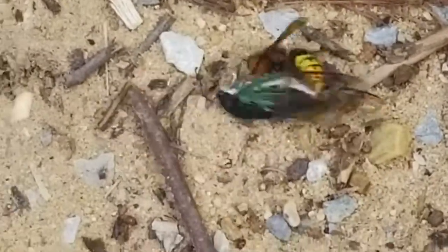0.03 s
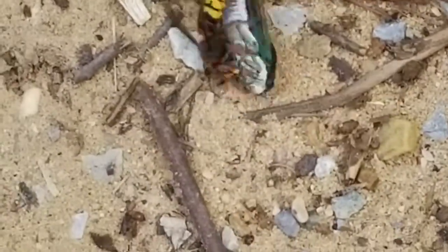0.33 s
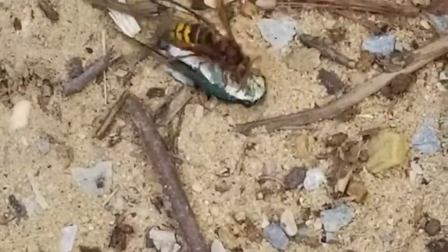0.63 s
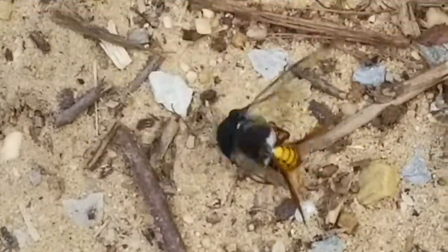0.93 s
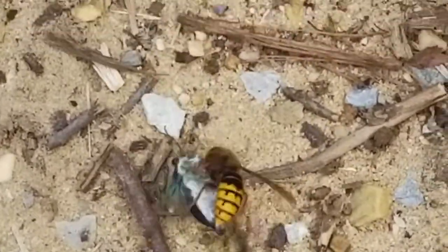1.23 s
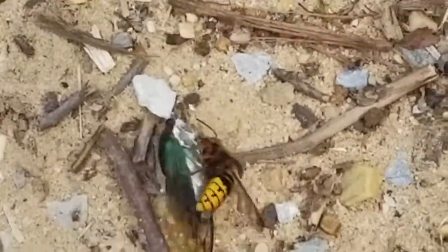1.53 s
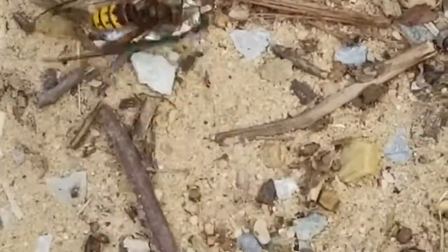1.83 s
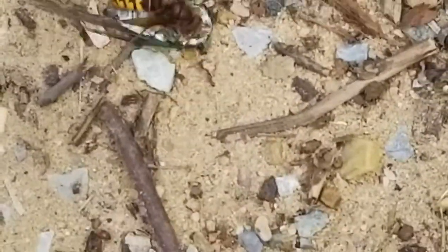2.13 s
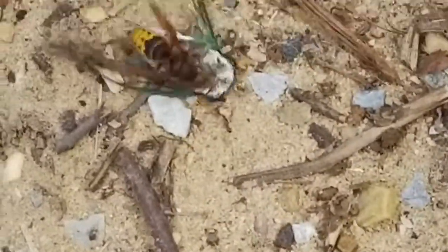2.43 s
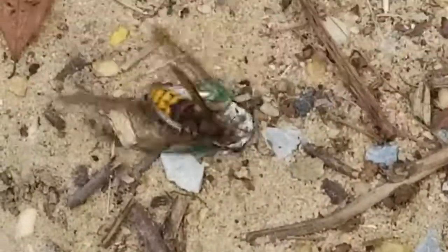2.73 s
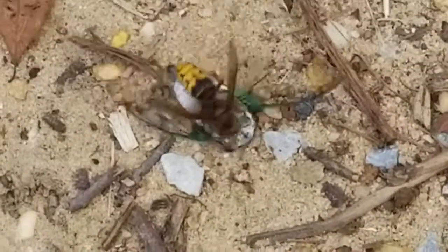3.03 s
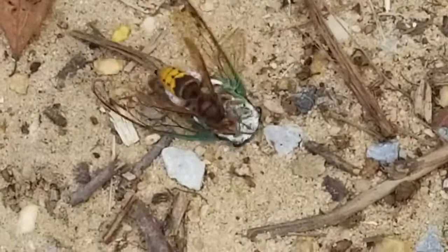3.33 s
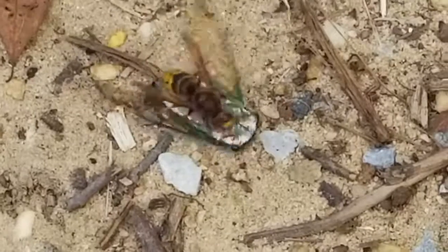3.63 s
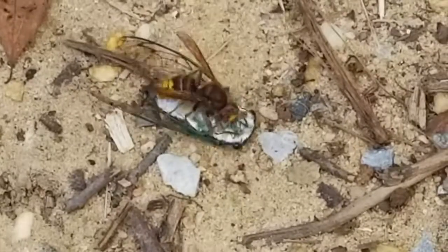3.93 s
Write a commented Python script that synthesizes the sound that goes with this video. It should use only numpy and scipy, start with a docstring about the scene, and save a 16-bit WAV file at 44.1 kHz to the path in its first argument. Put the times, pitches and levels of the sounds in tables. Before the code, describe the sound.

Insect wings flutter and scrape on sand as a wasp wrestles a cicada.

```python
"""Wasp and cicada on sand

Close to the microphone, a wasp wrestles a cicada on sandy ground. Stiff wings slap and scrape the grit,
legs and bodies rustle through it amid sharp ticks, and the wings whirr in short bouts over a low drone.
Farther off, insects buzz and chirp in the trees, with a few faint whistles and a distant rumble."""
import sys
import numpy as np
from scipy import signal
from scipy.fft import rfft, irfft
from scipy.io import wavfile
from scipy.ndimage import uniform_filter1d

SR = 44100
rng = np.random.default_rng(int(sys.argv[2]) if len(sys.argv) > 2 else 0)


def to_wav(sig):
    """Store sig (one row per channel, or 1-D mono) as 16-bit WAV at the path in sys.argv[1].

    Samples outside -1..1 are clipped; the rate is SR.
    """
    pcm = np.clip(np.atleast_2d(sig), -1, 1) * 32767
    pcm = np.round(pcm).astype(np.int16)
    wavfile.write(sys.argv[1], SR, pcm.T)  # frames by channels


N = 176400

# wings hitting the ground, close up (time [s], contact [s], grit [dB], wing ring [dB], crunch [dB])
WING_STRIKES = [(0.213, 0.0036, -48.5, -47, -53.5), (0.523, 0.015, -45, -59, -65),
                (0.753, 0.0037, -44.5, -43.5, -80), (0.887, 0.0045, -52, -52, -53),
                (1.223, 0.0028, -36.5, -36.5, -58), (1.263, 0.013, -42.5, -42, -49.5),
                (1.317, 0.0054, -41.5, -40, -47), (1.371, 0.011, -32.5, -33.5, -76),
                (1.435, 0.0075, -41, -44.5, -54.5), (1.659, 0.0032, -32.5, -28.5, -70),
                (1.689, 0.0069, -51, -46.5, -52), (1.884, 0.0052, -44.5, -40, -55),
                (1.907, 0.0028, -58, -41, -49), (1.929, 0.0024, -37, -31, -48),
                (1.976, 0.0039, -45, -44, -64), (2.126, 0.0044, -41.5, -38.5, -67),
                (2.321, 0.0056, -41, -41, -67), (2.346, 0.002, -42, -40, -52),
                (2.366, 0.006, -39, -48, -55), (2.389, 0.0087, -38.5, -41.5, -70),
                (2.419, 0.0092, -36.5, -42.5, -68), (2.437, 0.0046, -40, -42, -61),
                (2.463, 0.0074, -36.5, -40.5, -71), (2.513, 0.007, -39, -44, -69),
                (2.533, 0.002, -48, -36, -63), (2.539, 0.0033, -36.5, -37, -70),
                (2.575, 0.0038, -33, -38, -50), (2.631, 0.0075, -40.5, -45, -55),
                (2.748, 0.006, -46, -40.5, -75), (2.777, 0.006, -44, -37, -74),
                (2.8, 0.0044, -39, -43, -53.5), (2.822, 0.01, -46, -42, -74),
                (2.985, 0.0037, -43.5, -38, -77), (3.013, 0.0022, -37.5, -41, -65),
                (3.032, 0.0093, -45, -58, -52), (3.164, 0.005, -46, -55, -67),
                (3.181, 0.011, -41, -50, -72), (3.21, 0.0018, -37, -31.5, -44.5),
                (3.231, 0.0017, -37, -42, -53), (3.362, 0.0057, -38, -38.5, -57),
                (3.39, 0.003, -43, -45, -44), (3.409, 0.0076, -46, -54, -50),
                (3.428, 0.0056, -44, -41, -55), (3.57, 0.0046, -40.5, -43, -69),
                (3.597, 0.0018, -39, -44, -44), (3.614, 0.002, -45, -38.5, -56),
                (3.756, 0.0035, -39.5, -35.5, -75), (3.786, 0.0014, -41, -42, -54),
                (3.805, 0.004, -45, -52, -52.5)]
# bodies and legs dragged through the sand (start [s], end [s], level [dB])
BODY_DRAGS = [(0.083, 0.102, -59.5), (0.186, 0.23, -59), (0.25, 0.272, -59), (0.382, 0.416, -64.5),
              (0.49, 0.562, -59), (0.663, 0.705, -66.5), (0.756, 0.812, -55), (0.852, 0.912, -56.5),
              (1.02, 1.148, -70.5), (1.198, 1.311, -55.5), (1.326, 1.42, -52.5), (1.464, 1.491, -48.5),
              (1.497, 1.555, -64.5), (1.604, 1.67, -63.5), (1.654, 1.7, -47.5), (1.716, 1.792, -63.5),
              (1.888, 1.966, -48), (1.98, 2.022, -43.5), (2.104, 2.17, -53), (2.176, 2.234, -67),
              (2.317, 2.405, -49.5), (2.408, 2.565, -47.5), (2.568, 2.694, -53), (2.752, 2.788, -43),
              (2.808, 2.892, -47), (2.892, 2.949, -56.5), (2.982, 3.086, -47.5), (3.098, 3.23, -58.5),
              (3.222, 3.271, -42), (3.265, 3.295, -51), (3.36, 3.45, -49), (3.45, 3.51, -60),
              (3.572, 3.62, -51.5), (3.618, 3.652, -44.5), (3.65, 3.725, -54.5), (3.761, 3.857, -46),
              (3.837, 3.894, -52)]
# spectra of scattered grit, crunched soil and rustling sand (frequency [Hz], relative level [dB])
GRIT_SPECTRUM = [(600, -17), (1500, -12.5), (3100, -11), (4000, -5.5), (4800, -1), (5600, -17), (6800, 0),
                 (8100, -1.5), (9100, -0.5), (9800, 1), (11000, 6), (11450, -6.5), (12800, 0.5),
                 (15800, -5)]
CRUNCH_SPECTRUM = [(200, -12), (600, 1.5), (1050, 1.5), (1300, 1), (1750, 5), (3000, -6), (5000, 3.5),
                   (10000, -40)]
SAND_SPECTRUM = [(600, -19.5), (1500, -8), (3100, -10.5), (4000, -4.5), (4800, -3), (5600, -9), (6800, 1.5),
                 (8100, -0.5), (9100, -11), (9800, 3.5), (11000, 3), (11450, -3), (12800, -1),
                 (14200, -3.5), (15800, -5)]
# hollow taps on twigs and pebbles (time [s], pitch [Hz], level [dB])
HOLLOW_TAPS = [(1.319, 1080, -47), (1.373, 3750, -48), (1.376, 4830, -44), (2.577, 1750, -38)]
# the sharpest short, ringing ticks of the struggle (time [s], pitch [Hz], level [dB])
SHARP_TICKS = [(1.2245, 4770, -37), (1.3545, 7300, -44), (1.6425, 6940, -31), (2.4145, 7300, -35),
               (2.655, 7000, -34), (2.664, 4960, -38), (2.676, 6630, -36), (2.7585, 4400, -36),
               (2.855, 7270, -28), (3.0155, 7404, -32), (3.166, 5170, -36), (3.212, 4400, -35),
               (3.231, 5940, -33), (3.284, 4400, -38), (3.391, 4500, -38), (3.892, 6700, -36)]
# bouts of wing whirr (start [s], end [s], wingbeat [Hz], level [dB])
WHIRR_BOUTS = [(2.314, 2.424, 106.3, -39.5), (2.954, 3.186, 106, -39.5), (3.167, 3.427, 106, -44.5)]
# course of the low drone (time [s], pitch [Hz], level [dB])
DRONE_COURSE = [(0, 181, -50), (.58, 172, -51), (.7, 149, -55), (1.15, 150, -48), (1.72, 162, -42.5),
                (1.9, 159, -47), (2.01, 155, -37.5), (2.15, 153, -41.5), (2.6, 147, -48), (3.1, 142, -54),
                (4, 151, -48)]
# chirping insects behind the struggle (first chirp [s], period [s], top pitch [Hz], level [dB])
CHIRPING_INSECTS = [(.1215, .1271, 7830, -55.5), (.044, .1012, 7720, -58.5), (.09, .0712, 7690, -60)]
# insect chorus off in the trees (centre [Hz], resonator half-width [Hz], level [dB])
CHORUS_BANDS = [(6110, 230, -64), (6415, 200, -63), (7150, 670, -64.5), (7566, 300, -63)]
# faint whistles, far off (peak time [s], time from peak to -17 dB [s], pitch [Hz], level [dB])
FAR_WHISTLES = [(1.72, .15, 2340, -64), (1.9, .15, 2310, -59.5), (3.66, .07, 2640, -64),
                (3.98, .1, 2520, -61)]
# spectra of the distant rumble and the open air (frequency [Hz], relative level [dB])
RUMBLE_SPECTRUM = [(15, -24.5), (28, -20), (42, -22.5), (57, -8), (68, -7), (85, 1), (104, 3.5),
                   (120, -4.5), (150, -5), (185, -4.5), (220, -12), (252, -8), (290, -15), (400, -22.5),
                   (600, -31.5), (1200, -51.5)]
AIR_SPECTRUM = [(300, 1), (750, 0), (1000, 6), (1320, -5.5), (1750, 1), (2400, 1), (3200, -3.5),
                (5500, -3.5), (8200, -2), (8900, -18), (10800, -15), (11600, -31), (13000, -32),
                (15000, -19)]

SIDE = np.array([[1], [-1]])  # adds on the left, subtracts on the right


def wing_strikes():
    """Close to the microphone, each strike scatters grit, rings the stiff wing and crunches the soil."""
    _, _, grit_db, ring_db, crunch_db = np.array(WING_STRIKES).T
    grit = colour(contacts(grit_db, decay_s=.0018), GRIT_SPECTRUM, above_hz=7500)
    wing_ring = resonate(contacts(ring_db, decay_s=.0018), hz=7140, width_hz=1680)
    crunch = colour(contacts(crunch_db, decay_s=.004), CRUNCH_SPECTRUM)
    return grit + wing_ring + crunch


def contacts(levels_db, decay_s, attack_s=.0005):
    """One shower of impacts per wing strike, held while the wing touches the ground, then dying away."""
    out, size = np.zeros(N), SR // 25
    t = np.arange(size) / SR
    sand = grains(per_s=7000, scatter_db=5.5)
    for (start, contact_s, *_), db in zip(WING_STRIKES, levels_db):
        i = int(start * SR)
        envelope = np.minimum(t / attack_s, 1) * np.exp(-np.maximum(t - contact_s, 0) / decay_s)
        shower = unit(envelope * sand[i:i + size]) * np.sqrt(np.mean(envelope ** 2))
        out[i:i + size] += undb(db) * shower
    return out


def body_drags(attack_s=.0019, release_s=.0046, fade_db=-1.5):
    """Bodies and legs rustle through unevenly slipping sand, with lone ticks of grit."""
    t = clock()
    force = undb(-65) * (t / t[-1]) ** 2  # a slight shuffle grows with the struggle
    for start, end, db in BODY_DRAGS:
        progress = np.clip((t - start) / max(end - start, .01), 0, 1)
        attack = np.clip((t - start) / attack_s, 0, 1)
        release = np.exp(-np.clip(t - end, 0, .1) / release_s)
        force = np.maximum(force, undb(db + fade_db * progress) * attack * release)
    lone_impacts = uniform_filter1d(force, size=3000) * grains(per_s=56, scatter_db=3)
    ticks = resonate(lone_impacts, hz=6540, width_hz=4500)
    flutter_db, slip_db = 3 * walk(120), 2 * walk(39)
    rustle = force * undb(flutter_db + slip_db) * grains(per_s=4500, scatter_db=5)
    return colour(rustle, SAND_SPECTRUM, above_hz=4850) + undb(-10) * ticks


def rings(hits, decay_s):
    """Each tap or tick rings for a moment at a single pitch."""
    out = 0
    for at, hz, db in hits:
        since = np.clip(clock() - at, 0, .1)
        out += undb(db) * np.sin(2 * np.pi * hz * since) * np.exp(-since / decay_s)
    return out


def wing_whirr(ramp_s=.04, octave_db=-20):
    """Beating wings push the air near the microphone: a low tone and its octave."""
    t, bouts = clock(), np.array(WHIRR_BOUTS)
    midpoints = bouts[:, :2].mean(axis=1)
    wingbeat_hz = np.interp(t, midpoints, bouts[:, 2]) * (1 + .0082 * walk(20))
    phase = phase_of(wingbeat_hz)
    effort = sum(undb(db) * np.clip(np.minimum(t - start, end - t) / ramp_s + .5, 0, 1)
                 for start, end, _, db in WHIRR_BOUTS)
    return effort * unit(np.sin(phase) + undb(octave_db) * np.sin(2 * phase))


def drone():
    """A wavering low tone, dead centre, that swells midway."""
    t = clock()
    times, hz, db = np.array(DRONE_COURSE).T
    wavering_hz = np.interp(t, times, hz) * (1 + .012 * walk(25))
    return unit(np.sin(phase_of(wavering_hz))) * undb(np.interp(t, times, db) + 2 * walk(16))


def chirping_insects(rise_s=.012, fall_s=.017, ramp_s=.004, drop_hz=1120, rasp_hz=45):
    """Insects nearer than the chorus repeat raspy chirps that arch up and sweep down."""
    t, out = clock(), 0
    for first, period, top_hz, db in CHIRPING_INSECTS:
        jitter_s = .001 * walk(8)
        from_top = (t - first + jitter_s + period / 2) % period - period / 2
        hz = top_hz - drop_hz * np.minimum((from_top / fall_s) ** 2, 2) + rasp_hz * walk(1800)
        gate = np.clip(np.minimum(from_top + rise_s, fall_s - from_top) / ramp_s, 0, 1)
        out += gate * undb(db + 2 * walk(250)) * unit(np.sin(phase_of(hz)))
    return out


def insect_chorus(throb_db=1):
    """Many insects, far off in the trees, blur into throbbing narrow bands."""
    return sum(undb(db + throb_db * walk(120)) * resonate(noise(), hz, 2 * half_width, order=3)
               for hz, half_width, db in CHORUS_BANDS)


def far_whistles():
    """Whistles from a long way off, smeared by the trees."""
    t, out = clock(), 0
    for peak, fade_s, hz, db in FAR_WHISTLES:
        swell = np.exp(-2 * np.minimum(((t - peak) / fade_s) ** 2, 20))
        out += undb(db) * swell * resonate(noise(), hz, width_hz=105)
    return out


def rumble_and_air():
    """Distant rumble, nearly alike in both channels, and soft open air around the microphone."""
    rumble = colour(noise(), RUMBLE_SPECTRUM) * undb(-43 + .5 * walk(2.85))
    rumble_side = undb(-79) * resonate(noise(), hz=190, width_hz=300) * SIDE
    air = spread(lambda: colour(noise(), AIR_SPECTRUM)) * undb(-60.5 + .5 * walk(1.3))
    return rumble + rumble_side + air


def ground_echo(x, echo_db=-17.5, decay_s=.0068):
    """The microphone hears the direct sound plus a short scatter from the ground and things nearby."""
    t = np.arange(SR // 5) / SR
    tail = rng.standard_normal((2, len(t))) * np.exp(-t / decay_s)
    tail /= np.sqrt(np.sum(tail ** 2, axis=1, keepdims=True))
    return x + undb(echo_db) * signal.fftconvolve(x[None], tail, axes=1)[:, :N]


def spread(source, side_db=-16.5):
    """Left and right from a shared mid and a weaker, unrelated side."""
    return source() + undb(side_db) * source() * SIDE


def grains(per_s, scatter_db):
    """Random tiny impacts of uneven size."""
    impacts = (rng.random(N) < per_s / SR) * rng.choice([-1, 1], N)
    return unit(impacts * undb(scatter_db * np.clip(noise(), -2, 2)))


def colour(x, spectrum, above_hz=0):
    """Causal filter through (Hz, dB) points, scaled so white noise keeps unit power above above_hz."""
    f = np.fft.rfftfreq(N, 1 / SR)
    hz, db = np.array(spectrum).T
    gain = undb(np.interp(np.log(f + 1), np.log(hz), db))
    gain /= np.sqrt(np.mean(gain ** 2 * (f >= above_hz)))
    cepstrum = irfft(np.log(gain), N)
    cepstrum[1:N // 2] *= 2  # fold to minimum phase, so nothing rings ahead of an impact
    cepstrum[N // 2 + 1:] = 0
    return irfft(rfft(x) * np.exp(rfft(cepstrum)), N)


def resonate(x, hz, width_hz, order=2):
    """Identical resonators in series, each width_hz wide, with unit power gain overall."""
    f = np.fft.rfftfreq(N, 1 / SR) + 1
    response = (1 + 1j * (f / hz - hz / f) * hz / width_hz) ** -order
    return irfft(rfft(x) * response / np.sqrt(np.mean(abs(response) ** 2)), N)


def walk(per_s):
    """Smooth random wander of rms 1, with per_s new values a second."""
    hold = max(int(SR / per_s), 2)
    steps = np.repeat(rng.standard_normal(N // hold + 1), hold)
    return unit(uniform_filter1d(uniform_filter1d(steps, hold), hold)[:N])


def noise():
    """White noise of rms 1."""
    return rng.standard_normal(N)


def phase_of(hz):
    """Running phase of a changing pitch, in radians."""
    return 2 * np.pi * np.cumsum(hz) / SR


def undb(db):
    """Decibels to gain."""
    return 10 ** (np.asarray(db) / 20)


def unit(x):
    """Scale to rms 1."""
    return x / np.sqrt(np.mean(x ** 2) + 1e-20)


def clock():
    """Time of every sample in seconds."""
    return np.arange(N) / SR


def scene(pan_db=.7):
    """The struggle close up and just left of centre, the insects and rumble behind it."""
    on_sand = wing_strikes() + body_drags()
    taps_and_ticks = rings(HOLLOW_TAPS, decay_s=.0035) + rings(SHARP_TICKS, decay_s=.0011)
    struggle = ground_echo(on_sand + taps_and_ticks) * undb(SIDE * pan_db / 2)
    low_tones = wing_whirr() + drone()
    trees = ground_echo(chirping_insects() + far_whistles()) + spread(insect_chorus)
    return struggle + low_tones + trees + rumble_and_air()


def record(dry, top_hz=15850):
    """The recorder cuts the top treble steeply."""
    return signal.sosfilt(signal.ellip(10, .2, 70, top_hz, fs=SR, output="sos"), dry)


dry = scene()
out = record(dry)
to_wav(out)
```